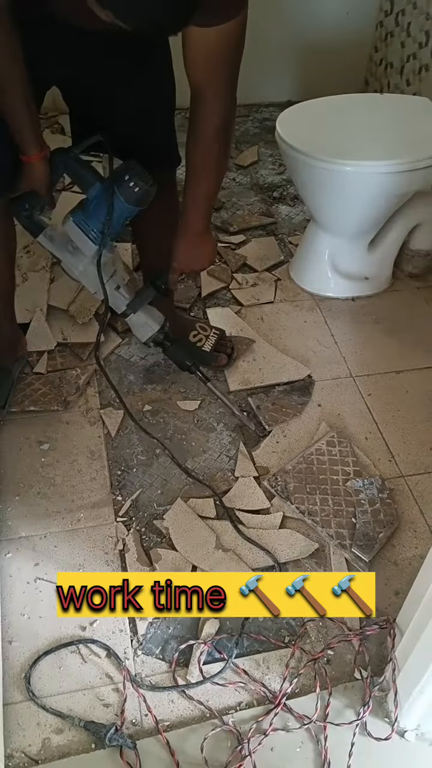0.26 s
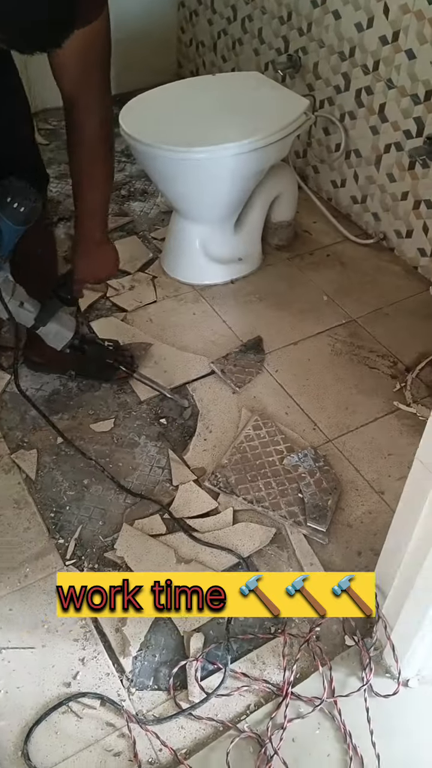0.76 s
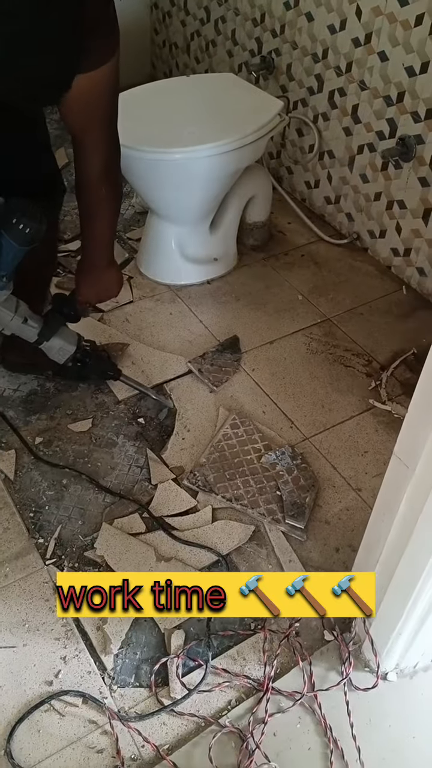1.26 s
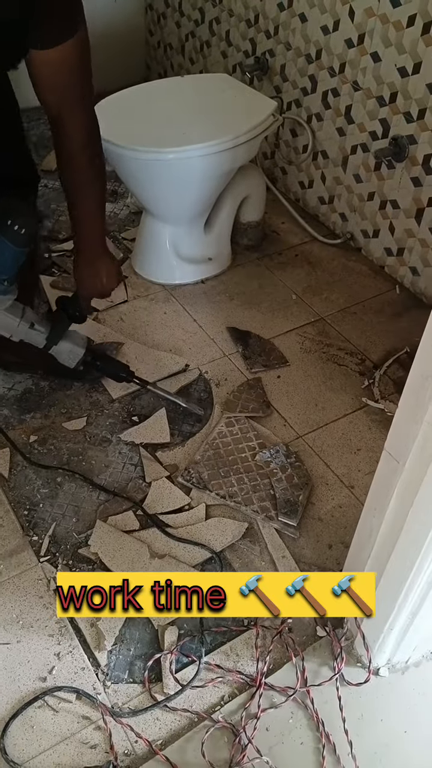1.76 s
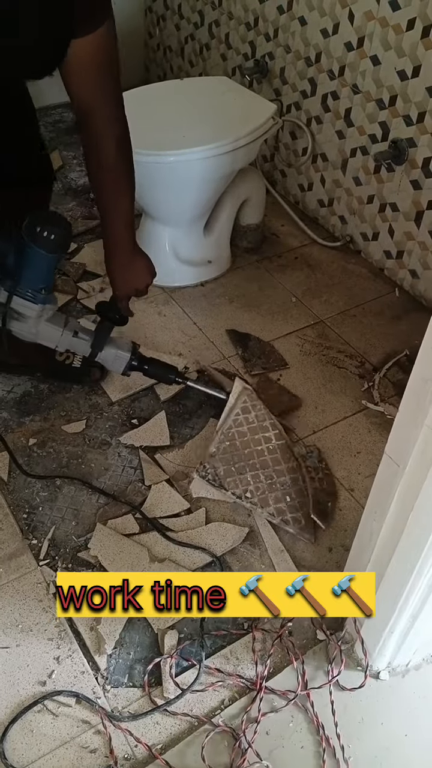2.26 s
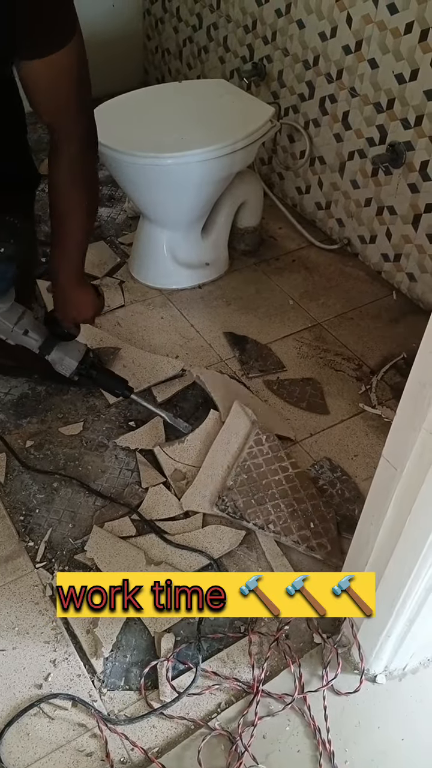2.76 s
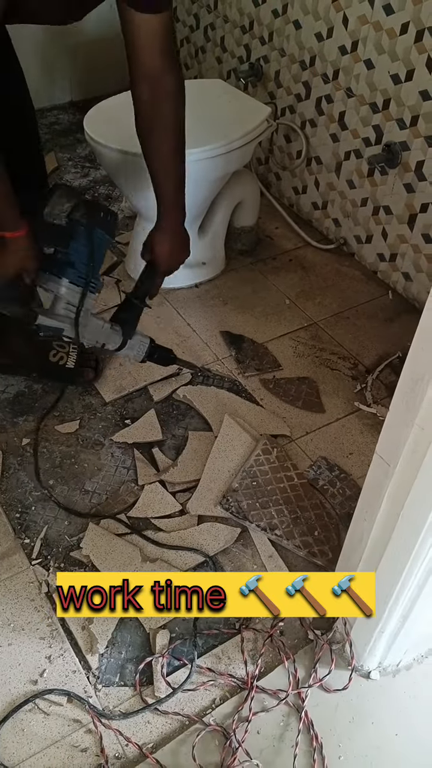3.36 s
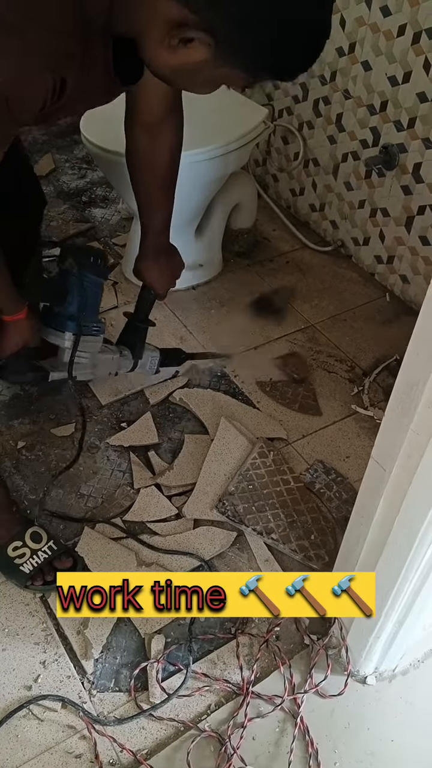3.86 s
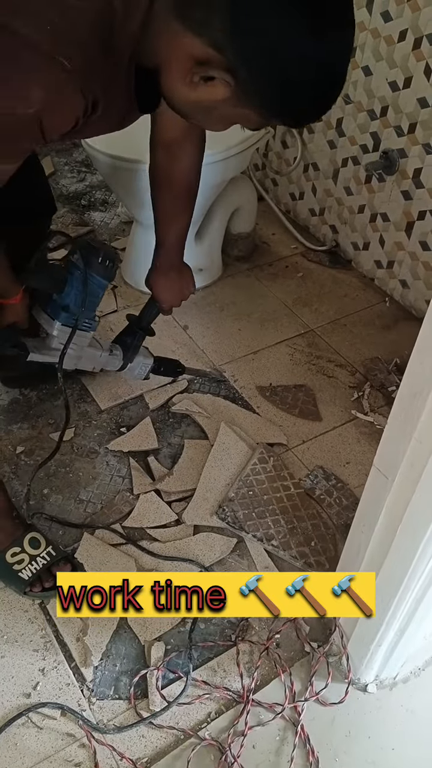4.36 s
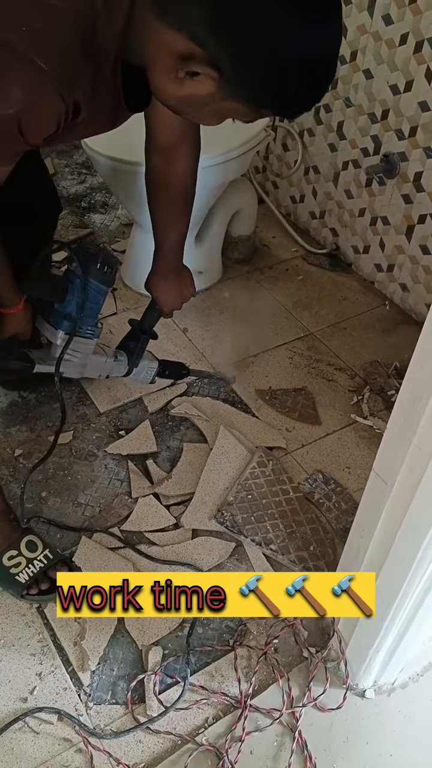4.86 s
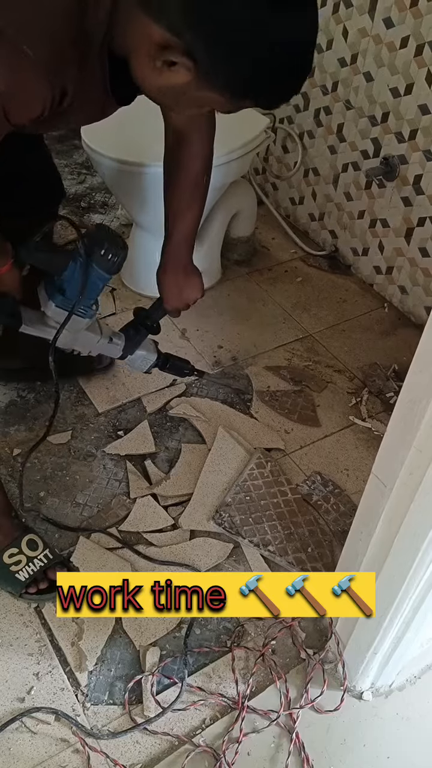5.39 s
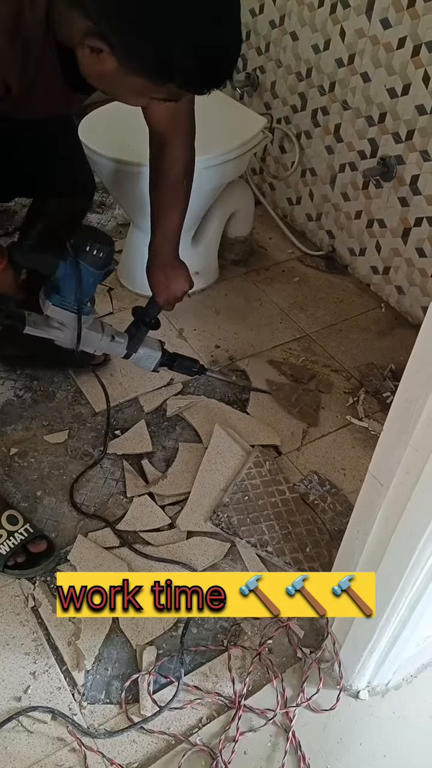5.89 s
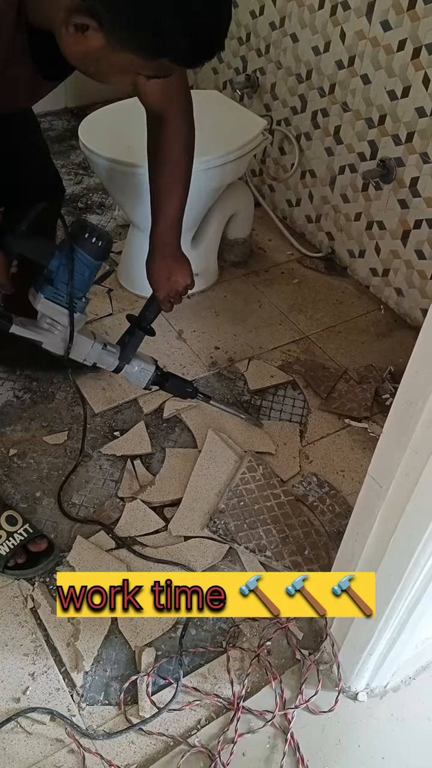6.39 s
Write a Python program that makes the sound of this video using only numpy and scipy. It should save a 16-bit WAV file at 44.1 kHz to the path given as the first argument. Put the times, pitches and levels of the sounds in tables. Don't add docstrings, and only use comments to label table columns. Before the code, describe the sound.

Brief rattling bursts of a power chisel crunch ceramic tile, each followed by clattering, slapping broken pieces and trickling grit in a reverberant tiled room.

```python
import sys
import numpy as np
from scipy import signal
from scipy.fft import rfft, irfft, next_fast_len
from scipy.io import wavfile
from scipy.ndimage import uniform_filter1d, map_coordinates

SR = 44100
rng = np.random.default_rng(int(sys.argv[2]) if len(sys.argv) > 2 else 0)


def to_wav(s):
    ch = np.atleast_2d(s).T
    pcm = np.round(np.clip(ch, -1, 1) * 32767)
    wavfile.write(sys.argv[1], SR, pcm.astype(np.int16))


def ratio(d):
    e = np.asarray(d, float) / 20
    return 10 ** e


N = 292383
ANSWER_LENGTH = 2 ** 14

# [f/Hz, width/Hz, level/dB]
CHISEL = [(2350, 730, -1.5), (4540, 56, -23), (6300, 140, 3), (8306, 49, 3.5), (10000, 50, -23),
          (11470, 130, 8), (12000, 63, -49), (14360, 300, 0)]


def along(points, hz):
    f, v = np.transpose(points)
    return np.interp(np.log(hz + 1), np.log(f + 1), v)


def unit(x):
    return x / np.sqrt(np.mean(x ** 2) + 1e-20)


def filtered(x, response):
    n = x.shape[-1]
    return irfft(rfft(x) * response(np.fft.rfftfreq(n, 1 / SR)), n)


def ringing(modes, hz):
    total = 0
    for k, (c, width, db) in enumerate(modes):
        total = total + (-1) ** k * ratio(db) * 1j * hz * width / (c * c - hz * hz + 1j * hz * width)
    return total


def lumps(n, rate_hz, depth_db):
    knots = rng.standard_normal(int(n * rate_hz / SR) + 4)
    return ratio(depth_db * map_coordinates(knots, [np.arange(n) * rate_hz / SR]))


def swell(t, start_s, end_s, rise_db_per_s, fall_db_per_s):
    return -rise_db_per_s * np.maximum(start_s - t, 0) - fall_db_per_s * np.maximum(t - end_s, 0)


def pair(n):
    # [f/Hz, correlation]
    likeness = [(30, 0.3), (60, .3), (130, 0.75), (290, .98), (640, 0.4), (1400, 0.03)]

    def mid_side(hz):
        turn = np.arccos(np.clip(along(likeness, hz), 0, 1)) / 2
        return np.array([np.cos(turn), np.sin(turn)])

    mid, side = filtered(rng.standard_normal((2, n)), mid_side)
    return np.array([mid + side, mid - side])


def room_answers(count):
    # [f/Hz, t60/s]
    decay = [(100, 0.68), (1000, 0.36), (4000, 0.36), (9000, 0.2), (15000, 0.068)]
    noise = np.array([pair(ANSWER_LENGTH) for _ in range(count)])
    hz, t, z = signal.stft(noise, SR, nperseg=256)
    fall = ratio(-60 * t / along(decay, hz)[:, None]) + ratio(9 - 60 * t / 0.046)
    fall = fall / np.linalg.norm(fall, axis=1)[:, None]
    tails = signal.istft(z * fall, SR, nperseg=256)[1][..., :ANSWER_LENGTH]
    return tails / np.linalg.norm(tails, axis=-1, keepdims=True)


def roomy(x, walls, direct_db):
    lead = 21
    n = x.shape[1]
    wet = irfft(rfft(x) * rfft(walls[int(rng.random() * len(walls))], n), n)
    near = filtered(x[0], lambda hz: hz ** 2 / (hz ** 2 + 230 ** 2))
    direct = ratio(direct_db) * np.array([near, np.roll(near, lead)])
    return (wet + direct) / np.hypot(1, ratio(direct_db))


def swaying(x, walls, direct_db):
    turn = 2 * np.pi * (4 * np.arange(x.shape[1]) / SR + rng.random())
    return np.cos(turn) * roomy(x, walls, direct_db) + np.sin(turn) * roomy(x[::-1], walls, direct_db)


def add(mix, x, s):
    part = mix[:, round(s * SR):][:, :x.shape[1]]
    part += x[:, :part.shape[1]]


def bands(x):
    hz = np.fft.rfftfreq(x.shape[1], 1 / SR)
    below = [1 / (1 + np.square((hz / edge) ** 3)) for edge in (130, 1400, 7500)]
    shares = np.diff([0 * hz] + below + [1 + 0 * hz], axis=0)
    return [unit(part) for part in irfft(rfft(x) * shares[:, None], x.shape[1])]


def chips(n, rate_hz, pitch_hz, cycles, scatter_db):
    draw = rng.random((int(n * rate_hz / SR) + 1, 4))
    hz = np.clip(pitch_hz * np.exp(2.4 * (draw[:, 1:2] - 0.5)), 300, 15000)
    size = ratio(-scatter_db * np.log(draw[:, 2:3]))
    k = np.arange(500)
    wave = size * np.sin(2 * np.pi * hz * k / SR) * np.exp(-k * hz / SR / cycles)
    at = (draw[:, :1] * n).astype(int) + k
    return unit(np.bincount(at.ravel(), wave.ravel(), minlength=n)[:n])


def hammer(mix, walls):
    # [full power t/s, trigger let go t/s, breaking level/dB, thud/dB and ring/dB re breaking]
    bursts = [(0.0, 0.102, -23, 4.5, 4), (1.48, 1.745, -21, 3, -2.5), (2.146, 2.377, -19.5, 7.5, -9.5),
              (3.94, 4.147, -21, -1.5, -2), (4.595, 4.924, -23, 1, 1), (4.996, 5.246, -21.5, 0.5, 0),
              (5.876, 6.195, -18.5, 0.5, -6.5)]
    hollow = [-1.5, 2.5, 4, -0.5, -0.5, 0.5, 0.5]
    bites = [2800, 2000, 467, 2200, 900, 2500, 644]
    # [f/Hz, width/Hz, level/dB over the crunch]
    hums = [
        [(1050, 200, 5), (2100, 300, 4.5), (5300, 350, -7)],
        [(596, 490, 0), (2800, 600, -5), (4750, 670, -3.5)],
        [(550, 560, 5), (1110, 510, 0), (4300, 410, -8)],
        [(1010, 240, -2), (2600, 310, -12), (4620, 400, -3)],
        [(1010, 600, -3.5), (3800, 660, -9), (5300, 500, -4.5)],
        [(670, 230, 0), (1150, 220, -4), (3280, 350, -11)],
        [(450, 330, -6), (1150, 400, -9), (4300, 750, -6)],
    ]
    # [f/Hz, level/dB per Hz]
    breaking = [(15, -49), (25, -8), (166, -4), (326, -1), (427, -4.5), (659, -1.5), (1610, -3.5),
                (2610, 4.5), (4490, 2), (8360, -2), (9320, -5), (11900, -2), (14500, -25), (16000, -24)]
    # [t/s, level/dB re breaking]
    shudders = [(1.55, -32), (1.72, -15), (2.2, -31), (2.34, -3.5), (4.04, -8.5), (4.68, -21), (4.8, -20),
                (5.05, -9.5), (5.22, -8), (5.93, -21), (6.08, -31), (6.18, -40)]
    blows_hz = 46.9

    for (on, off, db, thud_db, ring_db), hollow_db, bite_db_per_s, hum in zip(bursts, hollow, bites, hums):
        n = next_fast_len(round((off - on + 0.24) * SR), True)
        t = max(on - 0.06, 0) + np.arange(n) / SR
        along_burst = np.clip((t - on) / (off - on), 0, 1)
        giving = np.clip((t - off) / 0.18 + 0.5, 0, 2)

        unseated = np.exp(-np.maximum(t - on, 0) / 0.045)
        thud_db = thud_db - 8.5 * unseated - 3.5 * along_burst - 9 * giving
        ring_db = ring_db + along_burst - 13 * giving
        shudder = sum(ratio(g + swell(t, s, s, 260, 260)) for s, g in shudders)
        rumble = (ratio(-21) + shudder) * ratio(-9 * giving)

        turns = blows_hz * (t - on) + 0.05 * np.log(lumps(n, 22, 8.7))
        blow = np.floor(turns).astype(int) - int(np.floor(turns.min()))
        force = ratio(rng.normal(0, 1.5, blow.max() + 1))[blow]
        stroke = 0.82 + np.exp(-(turns % 1) / 0.16) * force

        gritty = stroke * lumps(n, 500, 3.5) * pair(n)
        tile = lambda hz: ratio(along(breaking, hz)) * (1 + sum(ringing([mode], hz) for mode in hum))
        crunch = filtered(gritty, tile)
        rings = filtered(gritty[0], lambda hz: np.array([ringing([mode], hz) for mode in CHISEL]))
        steel = sum(lumps(n, 14, 3.5) * ring for ring in rings)
        sound = unit(crunch) + ratio(-10) * unit(steel)
        sound = sound + ratio(-19) * chips(n, rate_hz=230, pitch_hz=3793, cycles=11, scatter_db=0.63)
        bass, low, middle, high = bands(swaying(sound, walls, direct_db=-7))
        low = unit(filtered(low, lambda hz: ratio(hollow_db * np.log2(np.clip(hz, 100, 900) / 500))))

        lead_in = -12 + swell(t, on - 1 / blows_hz + 0.025, on, 530, 0)
        start = np.maximum(swell(t, on, on, bite_db_per_s, 0), lead_in)
        run_down = swell(t, 0, off, 0, 279)
        pan = np.outer([0.25, -0.25], np.clip(-9 - 1.18 * ring_db, -18, 8))
        level = ratio(db + start + run_down + 4.5 + pan)
        beat = unit(stroke ** 0.46)
        parts = middle + ratio(thud_db) * low + ratio(ring_db) * high + rumble * bass
        add(mix, level * beat * parts, t[0])


def knock(mix, walls, s, db, rise_ms, clatter_ms, modes, dull_db):
    # [f/Hz, level/dB]
    crack = [(120, -58), (200, -56), (623, -13), (763, -11), (1000, -4), (1420, -3), (2700, -3), (3190, -2),
             (7970, -13.5), (16000, -53)]
    ms = np.arange(ANSWER_LENGTH) / SR * 1000
    hz = np.fft.rfftfreq(ANSWER_LENGTH, 1 / SR)
    swarm = (1 - np.exp(-ms / max(rise_ms, 0.1))) * np.exp(-ms / max(clatter_ms, 1))
    swarm = swarm * lumps(len(ms), 300, 3.4)
    swarm = swarm + ratio(8 - 2.5 * rise_ms) * np.exp(-ms / 0.88) * (ms > 0)
    contact = rfft(swarm * rng.standard_normal((2, len(ms))))

    sound = contact * ratio(along(crack, hz) - dull_db * np.log2((hz + 100) / 3000) / 2)
    sound = sound / np.sqrt(np.mean(np.abs(sound) ** 2))
    wall = walls[int(rng.random() * len(walls))][None]
    carried = np.sqrt(0.2 + np.abs(rfft(wall[0].sum(0))) ** 2 / 2.5)
    for c, level_db, t60 in modes:
        ring = contact[0] * ringing([(c, 2.2 / t60, 0)], hz)
        ring = ring / np.sqrt(np.mean(np.abs(ring * carried) ** 2))
        sound = sound + ratio(level_db + rng.normal(0, 1.5)) * ring
    size = np.linalg.norm(swarm) / swarm.max() / np.sqrt(len(ms))
    add(mix, ratio(db) * size * roomy(irfft(sound), wall, direct_db=-7), s)


def tiles(mix, walls):
    # [t/s, level/dB, clatter/ms, dullness/dB]
    slab_hits = [(0.126, -21, 8.9, -12), (0.3023, -4, 11, -0.5), (0.311, -8.5, 10, -4),
                 (0.3276, -4.5, 6, 1), (0.343, -12, 7.2, -1), (0.372, -14.5, 6.5, 2), (0.405, -31, 9, 8),
                 (0.432, -28.5, 7.7, 11), (0.523, -23.5, 16, -11), (0.588, -19, 4.8, 9),
                 (0.67, -8.5, 11, 6), (0.6827, -5, 6.9, 6), (0.698, -8.5, 4.3, 4), (0.723, -18, 5, 8),
                 (0.7782, -26, 11, -20), (2.8504, -25.5, 37, -1)]
    piece_hits = [
        (1.804, 2, 8.7, 0.14),
        (1.826, -8.5, 20, 1),
        (1.868, -13.5, 24, 1),
    ]
    flap_hits = [
        (2.378, 3, 9.2, -4),
        (2.419, -8, 16, -1),
        (2.445, -5.5, 15, 5),
        (2.551, -9, 5.4, -8),
    ]
    # [t/s, level/dB]
    crashes = [
        (2.3294, 2),
        (2.675, -3),
        (2.687, 0),
        (2.705, -15),
        (5.21, -7.5),
    ]
    # [t/s, level/dB]
    topples = [(3.03, -26), (3.039, -18), (3.0523, -13), (3.0588, -8.5), (3.066, -4.5), (3.087, -1.5),
               (3.102, 2.5), (3.118, -3), (3.133, -5.5), (3.15, -9.5), (3.17, -13.5), (3.214, -23),
               (3.24, -31)]
    # [t/s, level/dB]
    rattles = [
        (4.108, -0.5),
        (4.123, -1.5),
        (4.141, -6),
        (4.155, -2.5),
        (4.172, -15),
    ]
    # [t/s, level/dB]
    shard_hits = [(6.2851, -18), (6.3076, -9.5), (6.324, -17), (6.3664, -8.5), (6.377, -17), (6.4281, -19),
                  (6.44, -23), (6.468, -27)]
    # [t/s, level/dB]
    plate_hits = [(0.0, -15), (0.071, -13), (0.123, -16), (0.184, -26), (0.233, -21.5), (0.265, -19.5)]
    # [f/Hz, level/dB, t60/s]
    slab = [(1075, -10, 0.045), (1600, -14, 0.05), (2730, -3, 0.03), (2675, 0, 0.06), (3340, -7, 0.07),
            (3790, -6, 0.035), (4960, -6, 0.04), (5830, -13, 0.05), (6400, -13, 0.06), (7750, -14, 0.04)]
    piece = [(1040, -9, 0.1), (1620, -8, 0.04), (2590, -6, 0.06), (3220, 0, 0.07), (3760, -3, 0.04),
             (5630, -2, 0.06), (6580, 1, 0.05), (7920, -11, 0.07)]
    flap = [(2700, -8, .05), (5660, -11, 0.04), (6620, -7, 0.06), (7950, -2, 0.05)]
    heap = [(1030, -6.5, 0.08), (1290, -2.5, 0.041), (2220, -3.5, 0.05), (2640, 0, 0.038),
            (4180, -12, 0.05), (4470, -2, 0.034)]
    sheet = [(520, -6, .04), (1000, -3, 0.05), (2170, -6, 0.07), (2640, 0, 0.06), (2705, 0, 0.25),
             (3450, -6, 0.18), (4100, -4, 0.05), (5680, -14, .05), (8160, -13, .05)]
    corner = [(1230, -4, .05), (2230, -4, .05), (2730, -7, .05), (4310, -4, .07), (4560, 3, .05)]
    shard = [(2113, -2, 0.045), (3740, -3, 0.16), (5320, -11, .04), (6430, -14, 0.04), (7880, -4, .08),
             (9900, -17, .04), (14200, -20, .04)]
    plate = [(1065, 3, 0.08), (7660, -13, 0.05)]
    # [t/s, level/dB, f/Hz, dullness/dB]
    bits = [(0.5047, -15.5, 1050, -5), (0.923, -20, 5250, -2), (1.0666, -26, 6600, -11),
            (1.085, -22, 1180, -25), (1.115, -13, 910, -8.5), (1.72, -8, 2540, 11),
            (2.948, -21.5, 1690, 19), (3.441, -15.5, 2020, 4), (3.4897, -24, 3600, -17),
            (3.529, -17.5, 8560, -16), (3.429, -34, 1060, -10), (3.46, -19, 900, -6),
            (3.552, -18.5, 5170, 2), (3.5841, -25, 1020, 6), (3.717, -32, 1690, -39),
            (3.823, -32, 1520, -2), (3.846, -17.5, 2100, 1.5), (4.491, -17.5, 3740, -5),
            (5.6184, -18, 6100, -5), (5.7292, -20, 1300, 26), (5.766, -19.5, 2120, -5),
            (5.813, -22, 1350, 8), (6.495, -11.5, 1150, -7), (6.518, -13, 1290, -6),
            (6.58, -6.5, 1090, 5.5)]
    ticks = [(1.334, -20.5, 4280, -5), (1.404, -22, 6340, -4), (3.528, -10.5, 5200, 8),
             (3.586, -19, 5200, -1), (4.572, -9, 2300, -1), (4.579, -12, 2000, 5), (6.576, -8, 1860, 0),
             (6.605, -18, 1150, -2), (0.301, -11, 3700, -7), (1.46, -13, 2600, -3)]
    clinks = [(1.69, -6, 3800, 0), (1.725, -10, 2750, 0), (2.553, -15, 4200, 0), (2.562, -20, 3400, 0),
              (2.566, -17, 2350, 0), (6.186, -13, 8450, 0), (6.17, -15, 12100, 0), (4.786, -11, 8450, 0),
              (4.585, -16, 10400, 0), (2.33, -8, 2700, 0), (4.003, -11, 8450, 0), (5.2, -12, 8450, 0),
              (3.003, -34, 3520, 3), (3.485, -35, 9600, -6),
              (0.44, -39, 7640, 0), (0.923, -41, 5230, 0), (1.452, -25, 6360, 0), (1.868, -23, 7900, 0.0024),
             (2.425, -16, 8000, 0), (2.443, -13, 5650, 0), (2.445, -13, 6620, 0), (2.51, -20.5, 6600, 0),
             (2.47, -16, 6610, 0), (0.585, -31, 3800, 0), (0.366, -24, 3400, 0), (0.935, -40, 5230, 0),
             (0.7, -16, 1063, 0), (2.69, -7, 1150, 0), (2.71, -13, 1050, 0), (2.555, -20.5, 6400, 0),
             (2.625, -34, 4160, 0), (2.85, -20, 2710, 0), (3.45, -31, 3670, 0.008), (3.529, -26, 5180, 0),
             (3.555, -35, 5100, 0), (3.66, -53, 6840, 0), (3.847, -30.5, 4900, 0), (3.853, -44, 9300, 0),
             (4.562, -40, 11100, 0), (4.68, -19, 8450, 0), (4.76, -16, 5300, 0), (4.8, -13, 5300, 0),
             (4.802, -18, 8400, 0), (6.165, -21, 5300, 0)]
    thumps = [(1.118, -22.5, 188, 37), (4.491, -27, 201, 13), (5.762, -31.5, 274, 23),
              (6.308, -31, 398, 26)]
    landing = {"slab": (1.35, 0, -1.3), "piece": (1.6, 0, -8), "shard": (0.93, 5.5, 3.3),
               "heap": (2.46, 24.3, -11), "sheet": (2.9, 12.7, -11), "corner": (0.91, 8.6, -7),
               "bit": (3.1, 14, -4.5), "tick": (0.6, 5.9, -11), "plate": (2.8, 12.6, 0),
               "clink": (0.38, 15, 10.6), "thump": (1.6, 13.6, 13.5)}
    ring_s = {"bit": 0.025, "tick": .03, "clink": .05, "thump": 0.028}

    for kind, hits, modes in (("slab", slab_hits, slab), ("heap", crashes, heap), ("sheet", topples, sheet),
                              ("corner", rattles, corner), ("piece", piece_hits, piece),
                              ("piece", flap_hits, flap), ("shard", shard_hits, shard),
                              ("plate", plate_hits, plate)):
        rise_ms, usual_ms, ring_db = landing[kind]
        longer = 1.44 if kind == "slab" else 1
        rings = [(c, g + ring_db, t60 * longer) for c, g, t60 in modes]
        for s, db, *own in hits:
            clatter_ms, dull_db = own or (usual_ms, 0)
            knock(mix, walls, s, db + 40, rise_ms, clatter_ms, rings, dull_db)

    for kind, rows in (("bit", bits), ("tick", ticks), ("clink", clinks), ("thump", thumps)):
        rise_ms, clatter_ms, ring_db = landing[kind]
        for s, db, hz, dull_db in rows:
            overtones = [(min(hz * r, 7000), ring_db - 19.5, 0.04) for r in rng.uniform(1.4, 3.5, 2)]
            rings = [(hz, ring_db, ring_s[kind])] + overtones
            knock(mix, walls, s, db + 34.5, rise_ms, clatter_ms, rings, dull_db)


def rubble(mix, walls):
    # [f/Hz, level/dB per Hz]
    sliding = [(24, -59), (40, -69), (124, -10), (392, 2), (516, -6), (663, 5), (1150, 4.5), (1590, -10),
               (2440, -4), (6330, -10.5), (16000, -27)]
    # [t/s, level/dB, fade/dB per s, body/dB and grit/dB re level]
    slides = [(0.084, -23.5, 47, 0, -0.5), (0.324, -29.5, 98, -6, -11), (0.526, -32, 131, 1, -4.5),
              (0.683, -36.5, 64, -1, -12), (0.93, -51.5, 104, 9, 5.5), (1.112, -30.5, 173, -2, -8),
              (1.44, -43.5, 60, 3, -14), (1.75, -23.5, 71, -0.5, -8), (1.896, -29, 36, -8, -16),
              (2.39, -18.5, 25.5, -3, -14), (2.708, -24, 97, -19, -10), (2.88, -36, 40, -3, -22),
              (3.01, -35.5, 117, 0, -5), (3.115, -26, 190, 7, -14), (3.446, -38.5, 54, 3.5, -11),
              (3.556, -42.5, 159, 12, 5), (3.9, -40, 58, 2, -17), (4.2, -27, 11.5, -10, -11),
              (4.492, -29.5, 229, -6, -12), (4.95, -25.5, 56, 3.5, -3), (5.26, -25, 18, -13, -12),
              (5.638, -33, 73, -16, -6), (5.78, -51, 32.5, 9.5, 9.5), (6.23, -27.5, 11, -11, -8.5),
              (6.499, -32, 33, -6, -23)]
    n = next_fast_len(N, True)
    t = np.arange(n) / SR
    hiss = filtered(lumps(n, 60.1, 2.6) * pair(n), lambda hz: ratio(along(sliding, hz)))
    whirr = filtered(rng.standard_normal(n), lambda hz: ringing(CHISEL[:3], hz))
    trickle = chips(n, rate_hz=130, pitch_hz=3700, cycles=3.1, scatter_db=2.7)
    sound = unit(hiss) + ratio(-13) * unit(whirr) + ratio(-19) * trickle
    bass, low, middle, high = bands(swaying(sound, walls, direct_db=-6))

    power = np.zeros((3, n))
    for s, db, fade, body_db, grit_db in slides:
        slide = swell(t, s, s, 442, fade) - 55.5 * (t - s) ** 2
        faster = 1.58 * slide
        power += ratio(2 * (db + np.array([slide, body_db + faster, grit_db + faster])))
    level, body, grit = np.sqrt(power)
    layer = level * middle + body * (low + ratio(-20) * bass) + grit * high
    add(mix, layer[:, :N], 0)


def still_air():
    # [f/Hz, level/dB per Hz]
    air = [(15, -43), (25, -1.5), (317, 2), (1160, -1.5), (1560, -8), (2990, -11), (7920, -21.5),
           (14800, -45), (16000, -55)]
    noise = filtered(pair(next_fast_len(N)), lambda hz: ratio(along(air, hz)))
    return ratio(-44.5) * unit(noise)[:, :N]


def scene():
    mix = still_air()
    walls = room_answers(count=8)
    for source in (hammer, rubble, tiles):
        layer = np.zeros((2, N))
        source(layer, walls)
        mix = mix + layer
    return mix


def top_cut(x):
    return signal.sosfilt(signal.butter(12, 16150, fs=SR, output="sos"), x)


def record(dry):
    # [f/Hz, left minus right level/dB]
    ports = [(60, 0.5), (300, 0), (700, -4), (1300, -4.5), (2600, 0.5), (4000, -3.5), (6000, -17),
             (7200, -1.5), (7800, 34), (8300, 18), (10000, 14.5), (12000, 4), (14000, -8.5), (15500, -10)]
    share = lambda hz: np.sqrt(2 / (1 + ratio(np.outer([-2, 2], along(ports, hz)))))
    padded = np.pad(dry, ((0, 0), (0, next_fast_len(N + 999) - N)))
    x = filtered(padded, share)[:, :N]
    loudness = np.sqrt(np.abs(uniform_filter1d(np.mean(x ** 2, axis=0), size=350)))
    x = x / (1 + (loudness / 0.41) ** 2) ** 0.41
    x = x / (1 + np.abs(x / 0.94) ** 4) ** (1 / 4)
    return top_cut(x)


dry = scene()
out = record(dry)
to_wav(out)
```